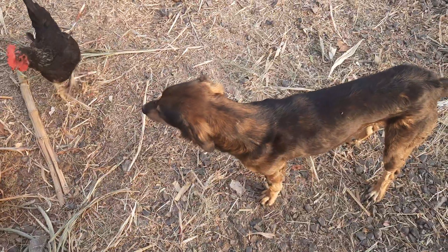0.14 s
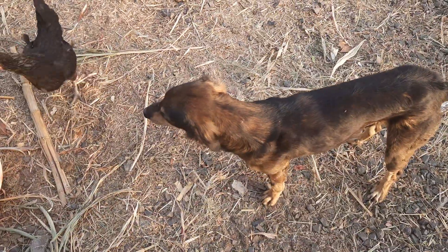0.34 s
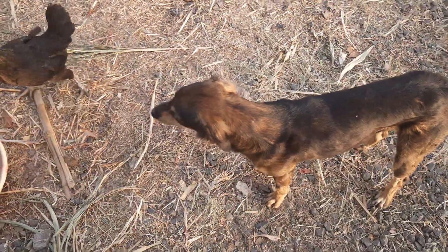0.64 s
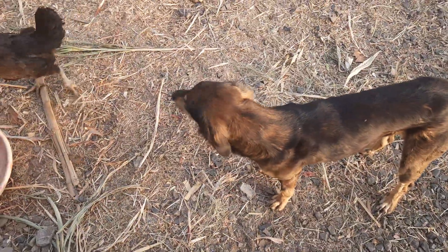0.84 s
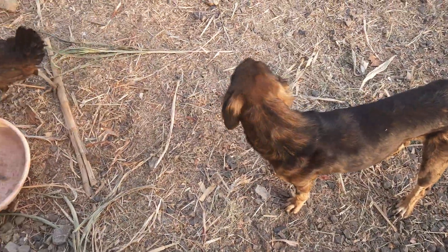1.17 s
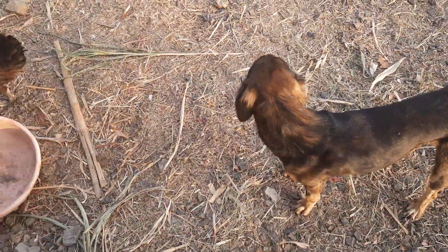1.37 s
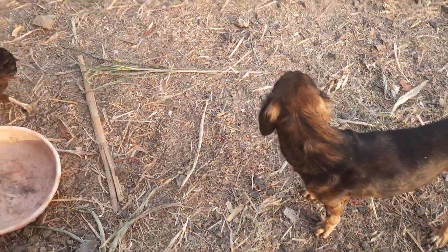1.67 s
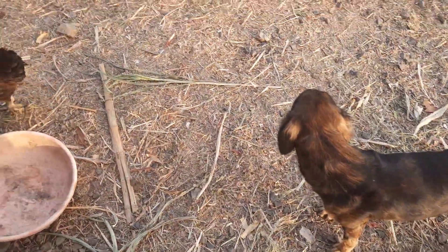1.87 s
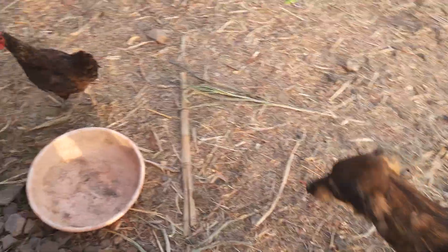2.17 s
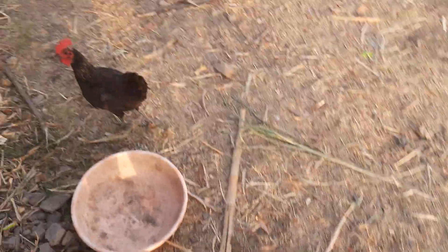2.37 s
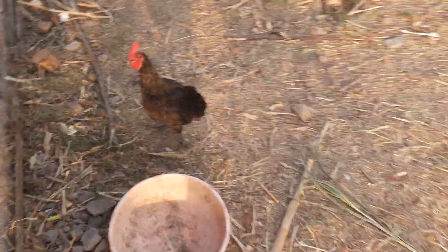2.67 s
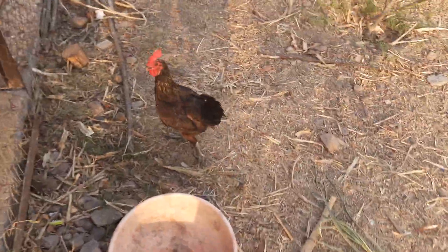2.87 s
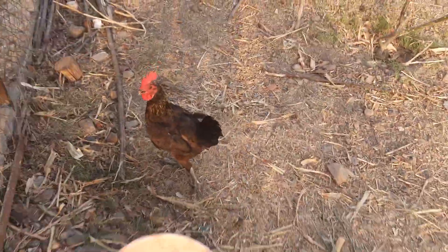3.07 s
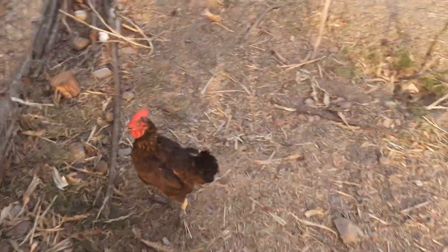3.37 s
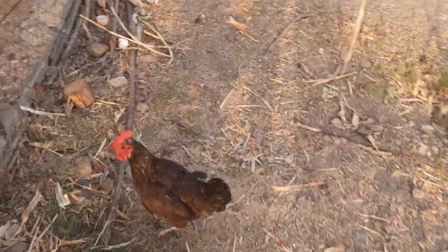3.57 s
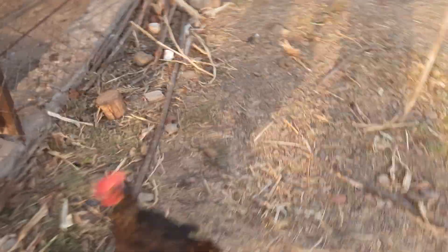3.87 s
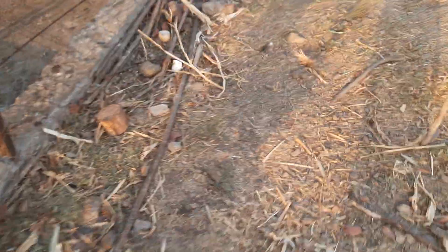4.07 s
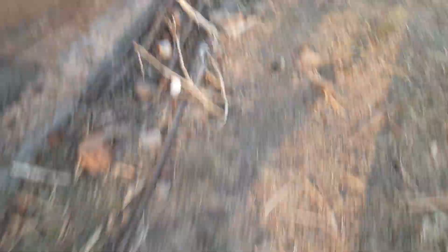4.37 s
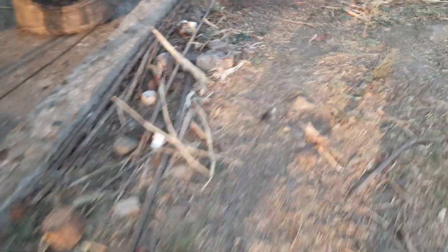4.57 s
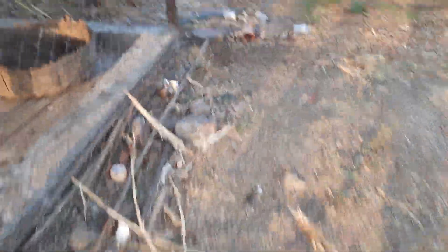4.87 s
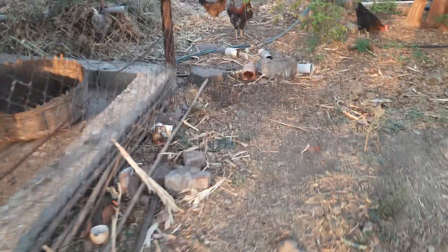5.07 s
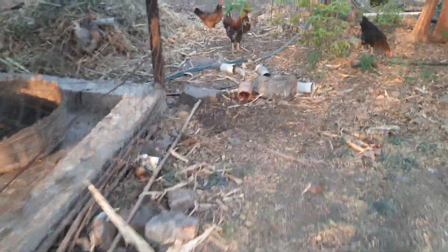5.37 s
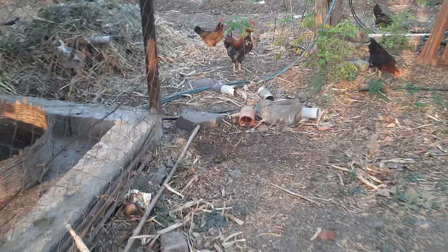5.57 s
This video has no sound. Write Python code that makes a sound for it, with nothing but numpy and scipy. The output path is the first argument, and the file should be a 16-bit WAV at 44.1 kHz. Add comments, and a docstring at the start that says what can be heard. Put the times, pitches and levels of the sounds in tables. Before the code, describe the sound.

A hen clucks in a quiet outdoor yard, with a slight echo. She starts with a brief, throbbing nasal whine and gives short, clear clucks about three times a second, spacing out a little until 2.8 seconds. From 3.2 to 3.7 seconds the clucks are quicker, softer and lower, mixed with thin falling squeaks. A longer, louder throbbing whine follows from about 3.6 to 4.4 seconds. Footsteps rustle dry straw, soft at first and louder from about 3.8 seconds, with scattered snaps, a cluster of cracking stalks around 5 seconds and a few tiny squeaks. Fingers bump the hand-held microphone at about 0.8, 3.8, 5.5 and 5.7 seconds, and brush it on the left around 3 to 3.5 seconds. Throughout, an insect ticks faintly, high and fast, over a low distant drone, and other fowl call far off in the first half.

```python
"""A hen in a straw yard

A hen clucks her way across a dry yard, pulses from her voice box ringing her throat and beak.
Twice a throbbing, nasal whine rises, and there are a few thin squeaks. Straw rustles and snaps
under foot, and fingers brush and bump the hand-held microphone. Behind it all are a low drone,
other fowl calling far off and an insect ticking in high pairs of wing strokes."""
import sys
import numpy as np
from scipy import signal
from scipy.fft import rfft, irfft
from scipy.io import wavfile

SR = 44100
rng = np.random.default_rng(int(sys.argv[2]) if len(sys.argv) > 2 else 0)


def waveform_to_disk(signal):
    """Save audio, clipped to [-1, 1], as 16-bit WAV at the path in sys.argv[1]."""
    frames = np.transpose(np.atleast_2d(signal))
    scaled = np.clip(frames, -1, 1) * 32767
    samples = np.round(scaled).astype(np.int16)
    wavfile.write(sys.argv[1], SR, samples)


N = 252693
TIME = np.arange(N) / SR


def from_db(db):
    """Turn decibels into a number to multiply by."""
    return 10 ** (np.asarray(db) / 20)


def rms_one(x):
    """Scale a signal to an average power of 1."""
    return x / np.sqrt(np.mean(x ** 2) + 1e-20)


def in_time(rows):
    """Join rows that begin with a time into curves, one for each other column."""
    s, *columns = np.transpose(rows)
    return [np.interp(TIME, s, c) for c in columns]


def at_hz(points, hz):
    """Read a spectrum's level in dB at any frequency."""
    return np.interp(np.log(hz), *np.transpose([(np.log(f), db) for f, db in points]))


def drift(rate):
    """A random wobble of about size 1 that turns `rate` times a second."""
    knots = rng.standard_normal(int(N / SR * rate) + 2)
    return rms_one(np.interp(TIME * rate, np.arange(len(knots)), knots))


def swell(s, width):
    """A smooth rise and fall around time s."""
    return np.exp(-((TIME - s) / width) ** 2 / 2)


def band(x, low_hz, high_hz, order=2):
    """Keep the sound between two frequencies."""
    edges = [low_hz, min(high_hz, SR / 2 - 1)]
    return signal.sosfilt(signal.butter(order, edges, "band", fs=SR, output="sos"), x)


def ring(x, hz, width_hz):
    """A resonance: each click starts a dying tone."""
    r, w = np.exp(-np.pi * width_hz / SR), 2 * np.pi * hz / SR
    return signal.lfilter([0, np.sin(w)], [1, -2 * r * np.cos(w), r * r], x + 1e-18)


def add(track, s, sound):
    """Mix a sound into a track at time s."""
    i = max(round(s * SR), 0)
    track[..., i:i + sound.shape[-1]] += sound[..., :N - i]


def pan(x, left_db):
    """Make stereo, with the left side louder than the right by left_db."""
    return x * from_db(np.array([np.atleast_1d(left_db), -np.atleast_1d(left_db)]) / 2)


def place(x, lead_ms, left_db, scatter_hz=800):
    """Sound reaches the right side later; the microphone's case scatters treble, which lags less."""
    hz = np.arange(N // 2 + 1) * SR / N
    lag_s = lead_ms / 1000 / np.hypot(1, hz / scatter_hz)
    late = irfft(rfft(x) * np.exp(-2j * np.pi * hz * lag_s), N)
    return pan(np.array([x, late]), left_db)


def noise(spectrum, alike):
    """Stereo noise in gently flickering bands; `alike` (0 to 1) is how well the two sides match."""
    edges = 22 * 2 ** np.arange(0, 10, .5)
    out, white = 0, rng.standard_normal((2, 2, N))
    for k, (low, high) in enumerate(zip(edges, edges[1:])):
        if high > spectrum[0][0] and low < spectrum[-1][0]:
            level_db = at_hz(spectrum, np.sqrt(low * high)) + 1.3 * drift(60)
            out = out + band(white[k % 2], low, high) * from_db(level_db)
    return rms_one(np.sqrt(1 + alike) * out[0] + np.sqrt(1 - alike) * out[1] * [[1], [-1]])


# The tone of the air. Each row: frequency in Hz, relative level in dB.
AIR_SPECTRUM = [(25, 15), (45, 13.5), (80, 22), (160, 7.5), (450, 3), (1000, -8), (2400, -2), (4500, -14),
                (16000, -52)]
# How loud the drone is. Each row: time in seconds, level in dB.
DRONE_LEVEL = [(0, -60.5), (2, -63), (2.7, -53.5), (4, -58), (5.7, -57)]


def air(air_db=-60.5, drone_hz=69):
    """Quiet outdoor air with a far, low drone that wavers."""
    phase = 2 * np.pi * np.cumsum(drone_hz + 2.5 * drift(14)) / SR
    drone = np.sin(phase) * from_db(in_time(DRONE_LEVEL)[0] + 2 * drift(10))
    return from_db(air_db) * noise(AIR_SPECTRUM, alike=0.69) + drone


# Echoes off walls and sheds. Each row: delay in seconds, level in dB.
WALL_ECHOES = [(.017, -25), (.029, -26), (.044, -25), (.061, -29)]


def yard(x, tail_db, t60):
    """A few wall echoes and a thin tail that fades 60 dB in t60 seconds, without bass."""
    t = TIME[:SR // 2]
    fade = from_db(-60 * t / t60) * np.minimum(t / 0.0096, 1)
    response = rms_one(rng.standard_normal((2, len(t))) * fade) * from_db(tail_db) / np.sqrt(len(t))
    for delay, echo_db in WALL_ECHOES:
        for side in response:
            side[int((delay + rng.uniform(0, .001)) * SR)] += from_db(echo_db)
    return signal.fftconvolve(band(x, 366, 12500)[None], response, axes=1)[:, :N]


# Distant calls. Each row: start in seconds, length in seconds, level in dB, beak ring in Hz.
FOWL_CALLS = [(0.614, 0.076, -58.5, 2370), (.84, 0.067, -60.5, 2650), (1.914, 0.096, -52.5, 2430),
              (2.544, 0.23, -54, 2110), (2.912, 0.029, -43, 2620), (3.06, 0.065, -52, 2600)]


def far_fowl(pitch_hz=418, beak_width_hz=740):
    """Other fowl call hoarsely: uneven pulses ring their beaks."""
    cycles = np.cumsum(pitch_hz * (1 + .08 * drift(200))) / SR
    pulses, out = np.diff(np.floor(cycles), prepend=0), np.zeros(N)
    for s, length, level_db, beak_hz in FOWL_CALLS:
        arch = np.sin(np.linspace(0, np.pi, int(length * SR)))
        voice = ring(pulses[int(s * SR):][:len(arch)], beak_hz, beak_width_hz)
        voice = ring(voice, beak_hz, 2 * beak_width_hz)
        add(out, s, from_db(level_db) * arch * rms_one(band(voice, beak_hz / 2, beak_hz * 2)))
    return out


# How loud the insect is. Each row: time in seconds, level in dB.
INSECT_LEVEL = [(0, -48), (.8, -48), (1.4, -50), (1.9, -55), (2.6, -44), (3.3, -47), (4.3, -49), (5.7, -52)]
# Spells of ticking. Each row: start and end in seconds.
TICKING_SPELLS = [(.046, 1.0), (1.076, 5.72)]


def insect(top_hz=8500, bottom_hz=6950, period_s=.0583, pair_gap_s=0.018, stroke_s=.013):
    """Pairs of wing strokes, each a scratchy falling chirp, over a faint far chorus."""
    out, along = np.zeros(N), np.linspace(0, 1, int(stroke_s * SR))
    for s in np.concatenate([np.arange(begin, end, period_s) for begin, end in TICKING_SPELLS]):
        for start in (s - stroke_s / 2, s - stroke_s / 2 + pair_gap_s):
            pitch = (top_hz + (bottom_hz - top_hz) * along) * (1 + .012 * rng.standard_normal())
            scratch = rms_one(band(rng.standard_normal(len(along)), bottom_hz, top_hz))
            stroke = np.sin(2 * np.pi * np.cumsum(pitch) / SR) + scratch / 2
            add(out, start, stroke * np.sin(np.pi * along) ** 2 * from_db(rng.standard_normal()))
    chorus = from_db(-10.5) * rms_one(band(rng.standard_normal((2, N)), bottom_hz, top_hz, order=3))
    return (out + chorus) * from_db(in_time(INSECT_LEVEL)[0])


# Footfalls. Each row: middle and width in seconds, straw level and soil level in dB.
FOOTFALLS = [(.13, 0.16, -49.5, -56), (.68, 0.17, -61, -61.5), (1.3, 0.14, -59, -69.5),
             (2.04, 0.12, -51.5, -61.5), (2.55, .12, -47.5, -50.5), (3.26, 0.038, -54, -47),
             (3.78, 0.14, -43, -44), (4.3, 0.088, -43.5, -51), (4.6, 0.14, -50.5, -69),
             (5.0, 0.11, -47, -55), (5.53, 0.19, -44.5, -50)]
# The straw's growing rustle between steps. Each row: time in seconds, level in dB.
RUSTLE_LEVEL = [(0, -73.5), (1.8, -63.5), (3.0, -55), (5.7, -51.5)]
# Its high hiss. Each row: time in seconds, level in dB before the boost.
STRAW_HISS_LEVEL = [(0.0, -62), (0.56, -71), (1.28, -64), (1.48, -66.5), (1.71, -76), (2.89, -69),
                    (3.11, -65), (3.48, -70), (3.81, -57.5), (4.2, -62), (4.44, -64.5), (4.55, -51),
                    (5.01, -57), (5.34, -51.5), (5.54, -51), (5.73, -47.5)]
# Where the hiss sits. Each row: time in seconds, left over right in dB.
HISS_SIDE = [(2.3, 1), (3.5, 6.5), (4.6, 3), (5.7, 3)]
# The tone of crunch, hiss and soil. Each row: frequency in Hz, relative level in dB.
CRUNCH_SPECTRUM = [(300, -53), (700, 2.5), (1300, 9), (2500, 10), (4000, 2), (7000, 1), (15000, -49)]
HISS_SPECTRUM = [(1500, -28), (3500, 6.5), (6500, 14.5), (9500, 7.5), (12000, 20), (16000, 0)]
SOIL_SPECTRUM = [(125, -12.5), (250, 2.5), (500, 9), (900, -8.5), (2000, -44)]


def footsteps(grain_db=2.0, hiss_boost_db=7, soil_under_straw_db=-5.5):
    """Each step swells and fades, scuffing soil and crushing straw, which gives way in tiny grains."""
    rustle = from_db(in_time(RUSTLE_LEVEL)[0])
    straw_power, soil_power = rustle ** 2, (rustle * from_db(soil_under_straw_db)) ** 2
    for s, width, straw_db, soil_db in FOOTFALLS:
        weight = swell(s, width)
        straw_power += (weight * from_db(straw_db)) ** 2
        soil_power += (weight * from_db(soil_db)) ** 2
    grains = rms_one(from_db(grain_db * drift(700)))
    crunch = pan(noise(CRUNCH_SPECTRUM, alike=0.033) * np.sqrt(straw_power), left_db=-1.5)
    hiss_gain = from_db(in_time(STRAW_HISS_LEVEL)[0] + hiss_boost_db)
    hiss = pan(noise(HISS_SPECTRUM, alike=0.017) * hiss_gain, in_time(HISS_SIDE)[0])
    return grains * (crunch + hiss) + noise(SOIL_SPECTRUM, alike=0.66) * np.sqrt(soil_power)


# Short rubs. Each row: middle and width in seconds, level in dB, centre in Hz, left over right in dB.
RUBS = [(2.70, 0.047, -50, 125, -15), (4.42, 0.044, -52, 770, 23), (4.69, 0.057, -41, 5700, -1.5),
        (4.70, .032, -45.5, 199, 1.5), (4.86, 0.021, -52.5, 251, 8), (5.40, 0.086, -51, 330, 20)]


def shuffles(spread=1.427):
    """A dragged foot or shifting hand rubs out a band of noise: low on soil and skin, high on straw."""
    out = 0
    for s, width, level_db, hz, left_db in RUBS:
        white = rng.standard_normal(N) + 0.64 * rng.standard_normal((2, N))
        rub = rms_one(band(white, hz / spread, hz * spread))
        out = out + pan(rub * swell(s, width) * from_db(level_db), left_db)
    return out


# The loudest stalks breaking. Each row: start in seconds, level in dB before the trim,
# pitch in Hz, left over right in dB.
BIG_SNAPS = [(0.173, -25.5, 1380, 2), (0.236, -31.5, 4150, 0), (0.611, -25.5, 902, -6.5),
             (2.202, -34, 6500, 2), (2.339, -39, 7060, 0), (2.451, -35, 869, 1), (4.543, -27, 2700, 8),
             (4.936, -26, 1130, 4.0), (4.953, -21.5, 4150, 5), (4.972, -22, 4310, 5), (4.981, -28, 2390, 0),
             (5.005, -22.5, 6840, 3), (5.045, -24.5, 6850, 5), (5.17, -26, 3000, 3), (5.488, -25, 921, -2),
             (5.504, -25, 907, -4)]
# Small stalks giving way at random. Each row: start and end in seconds, snaps per second,
# typical level in dB before the trim, typical pitch in Hz.
SMALL_SNAPS = [(2.101, 2.899, 5, -44.5, 6940), (4.931, 5.099, 90, -28.5, 3480)]


def snaps(crack_s=0.0022, splinter_db=-17, splinter_s=0.041, trim_db=-6, broad_db=-4, spread_db=3):
    """A stalk breaks with a broad crack, strongest around its own pitch, and a short splintering."""
    out, t = np.zeros((2, N)), TIME[:SR // 20]
    fade = np.exp(-t / crack_s) + from_db(splinter_db) * np.exp(-t / splinter_s)
    stalks = list(BIG_SNAPS)
    for begin, end, per_s, db, hz in SMALL_SNAPS:
        for when, size, pitch in rng.random((round((end - begin) * per_s), 3)):
            s = begin + (end - begin) * when
            stalks.append((s, db + spread_db * (2 * size - 1), hz * 2 ** (2 * pitch - 1), 2))
    for s, level_db, hz, left_db in stalks:
        white = rng.standard_normal(len(t)) + 2.4 * rng.standard_normal((2, len(t)))
        crack = rms_one(band(white, hz / 1.69, hz * 1.44))
        crack += from_db(broad_db) * rms_one(band(white, 600, 7300, order=1))
        add(out, s, pan(from_db(level_db + trim_db) * fade * crack, left_db))
    return out


# Knocks on the case. Each row: start in seconds, level in dB, pitch in Hz, seconds to fade 60 dB,
# crack compared with thud in dB, left over right in dB.
CASE_BUMPS = [(0.8341, -18, 472, 0.012, 3.5, -22), (0.834, -38.5, 308, 0.073, 15.5, 8),
              (3.7808, -21, 860, 0.014, -27, -3), (3.7855, -17.5, 890, 0.012, -12, 0),
              (5.5048, -15, 920, 0.011, -3, 5), (5.667, -19.5, 443, 0.015, -18, -14),
              (5.674, -23.5, 193, 0.04, -28, -13), (5.6865, -18.5, 255, 0.018, -2.5, -19.5)]
# Sliding fingers. Each row: middle and width in seconds, level on the left in dB.
FINGER_BRUSHES = [(2.98, 0.025, -42.5), (3.04, 0.015, -35.5), (3.162, 0.014, -27), (3.22, 0.041, -37),
                  (3.405, 0.023, -44.5), (3.50, 0.025, -45.5), (4.429, 0.046, -39.5)]
# The tone of rubbing skin. Each row: frequency in Hz, relative level in dB.
SKIN_SPECTRUM = [(200, -2.5), (1000, -0.5), (3200, -2.5), (6000, -4), (9000, -6), (12500, -5), (16000, 3.5)]


def fingers(crack_s=0.00017):
    """Fingers bump the microphone's case, which thuds, and slide over its left opening."""
    out, t = np.zeros((2, N)), TIME[:SR // 10]
    for s, level_db, hz, t60, crack_db, left_db in CASE_BUMPS:
        thud = -np.sin(2 * np.pi * hz * t) * from_db(-60 * t / t60)
        crack = from_db(crack_db) * np.exp(-t / crack_s)
        add(out, s, pan(from_db(level_db) * (thud + crack), left_db))
    pressure = sum(from_db(db) * swell(s, width) for s, width, db in FINGER_BRUSHES)
    return out + noise(SKIN_SPECTRUM, alike=0) * pressure * from_db([[0], [-24]])


# Squeaks. Each row: start and length in seconds, first and last pitch in Hz, level in dB,
# octave compared with the main tone in dB.
SQUEAK_GLIDES = [(3.25, 0.15, 2236, 1840, -40, -34), (3.409, .115, 2155, 1470, -37.5, -36),
                 (3.506, 0.065, 544, 600, -40.5, 5), (3.625, 0.042, 560, 521, -36.5, 10),
                 (3.661, 0.05, 516, 507, -32.5, -7), (4.641, 0.0184, 918, 594, -41, -8),
                 (4.888, 0.0134, 876, 740, -46.5, 10), (5.109, 0.026, 968, 620, -31.5, -1),
                 (5.506, 0.023, 931, 720, -30, -24), (5.704, 0.029, 876, 736, -40, 2.5)]


def squeaks(bend=1.4):
    """Thin, fluttering tones slide in pitch, each with a second tone an octave above."""
    out = np.zeros(N)
    for s, length, first_hz, last_hz, level_db, octave_db in SQUEAK_GLIDES:
        along = np.linspace(0, 1, int(length * SR))
        waver_hz, flutter_db = 26 * drift(450)[:len(along)], 1.5 * drift(300)[:len(along)]
        pitch = first_hz + (last_hz - first_hz) * along ** bend + waver_hz
        phase = 2 * np.pi * np.cumsum(pitch) / SR
        tone = np.sin(phase) + from_db(octave_db) * np.sin(2 * phase)
        add(out, s, from_db(level_db + flutter_db) * np.sin(np.pi * along) * tone)
    return out


# Each whine's course along the tops of its throbs. Each row: time in seconds, pitch in Hz, level in dB.
FIRST_COURSE = [(0, 493.5, -31), (.135, 480.7, -34.5), (.18, 464, -35), (.215, 452, -35), (.25, 441, -45.5),
                (.29, 430, -50.5)]
SECOND_COURSE = [(3.55, 422.4, -57), (3.64, 429.5, -45.5), (3.72, 448, -29.5), (3.805, 450.4, -24),
                 (4.057, 477.6, -23.5), (4.235, 459.2, -25.5), (4.38, 424.6, -44)]
# How the throat colours each whine. Each row: frequency in Hz, relative level in dB.
FIRST_COLOUR = [(480, -9.5), (960, -4.5), (1440, 2), (1930, -8.5), (2400, -22), (2900, -7), (3400, -7.5),
                (3870, -6), (4350, -2), (4800, -6), (5300, -7), (5800, -12), (7000, -14), (9000, -42)]
SECOND_COLOUR = [(460, -1), (920, -5), (1380, 1), (1840, -3), (2320, -6.5), (2780, -14), (3230, -0.5),
                 (3700, -12), (4100, 7.5), (4450, 6.5), (4750, -6.5), (5150, -9.5), (5800, -19.5),
                 (6450, -9.5), (9000, -47)]


def whine(course, throat, crest_s, period_s, sag_db, dip_share, jitter_share, rasp_db):
    """A nasal held note; after each throb the level sags and the pitch drops fast, then climbs back."""
    top_hz, level_db = in_time(course)
    along = ((TIME - crest_s) / period_s + .03 * drift(12)) % 1  # 0 to 1 between throbs
    sag = np.sin(np.pi * along) ** 2
    dip = dip_share * np.sin(np.pi * along ** 0.68) ** 2 * from_db(2 * drift(12))
    pitch = top_hz * (1 - dip + jitter_share * (.5 + sag) * drift(400))
    on = (TIME > course[0][0]) & (TIME < course[-1][0])
    phase = 2 * np.pi * np.cumsum(pitch[on]) / SR
    tone, out = 0, np.zeros(N)
    for k in range(1, 21):
        # the head moves, so each overtone grows and fades a little on its own
        overtone_db = at_hz(throat, k * pitch[on]) + 2 * drift(25)[on]
        tone = tone + from_db(overtone_db) * np.sin(k * phase - k * k / 10)
    rasp = rms_one(band(rng.standard_normal(len(phase)), 2800, 7500) * (1 + np.cos(phase)))
    out[on] = rms_one(tone) + from_db(rasp_db) * rasp
    return out * from_db(level_db - sag_db * sag * (1 + .2 * drift(12)))


# Where the calls come from. Each row: time in seconds, head start of the left side in milliseconds.
LEFT_LEAD = [(2.1, 0.36), (2.6, 0.14)]


def passing(x):
    """The calls move towards the front: the right side hears them less and less late."""
    late = np.interp(TIME - in_time(LEFT_LEAD)[0] / 1000, TIME, x)
    return pan(np.array([x, late]), left_db=-2)


# The hen's clucks. Each row: start and length in seconds, first pulse rate in Hz, level in dB,
# beak ring in Hz, beak compared with throat in dB.
HEN_CLUCKS = [(0.016, 0.027, 148.1, -20, 1035, -3.5), (0.333, 0.029, 154.8, -19, 1110, -5.5),
              (.553, 0.026, 147.6, -19, 1020, -3), (0.721, 0.026, 150.3, -19, 1190, -6.5),
              (1.124, 0.024, 161.8, -19, 1160, -10.5), (1.339, 0.023, 172, -20.5, 935, -2),
              (1.62, 0.031, 154.3, -23.5, 1050, -8), (2.098, .032, 164.8, -26, 1300, -3.5),
              (2.464, 0.025, 153, -22, 1196, -2), (2.776, .031, 245.3, -25, 1166, 1),
              (3.203, .029, 291.2, -31, 1160, 9.5), (3.38, 0.036, 288.2, -26.5, 1140, 2.5),
              (3.477, 0.043, 309, -35, 960, 13), (3.58, .044, 342, -29, 1000, 7),
              (3.709, .043, 352.4, -28.5, 1030, 12)]
# The throat's main ring, lower in the later clucks. Each row: time in seconds, frequency in Hz.
THROAT_RING = [(0, 602), (1.2, 602), (3.39, 481), (3.47, 338)]
# Its higher rings. Each row: frequency and width in Hz, level compared with the main ring in dB.
HIGH_RINGS = [(1640, 120, -12.5), (2330, 174, -22.5), (2930, 100, -28.5), (3890, 290, -24.5)]


def clucks(aim_hz=312.2, reach=.82, shimmer_db=1.3, leak=.022, throat_width_hz=135, beak_width_hz=170):
    """Each cluck is a short run of pulses from the voice box that ring the throat and beak."""
    out = np.zeros(N)
    for s, length, first_hz, level_db, beak_hz, beak_db in HEN_CLUCKS:
        t = TIME[:int((length + .03) * SR)]
        along = np.minimum(t / length, 1)
        # the pulse rate slides most of the way to aim_hz
        cycles = np.cumsum(first_hz + reach * (aim_hz - first_hz) * along ** 1.7) / SR
        effort = np.interp(along, [0, .54, 1], [.49, 1, .4]) * (along < 1)
        openings = np.diff(np.floor(cycles), prepend=-1)
        pulses = openings * from_db(shimmer_db * rng.standard_normal(len(t)))
        breath = leak * rng.standard_normal(len(t)) * np.exp(-4 * (cycles % 1))  # after each opening
        source = effort * (pulses + breath)
        throat_hz = np.interp(s, *np.transpose(THROAT_RING))
        voice = ring(source, throat_hz, throat_width_hz)
        voice -= from_db(beak_db) * ring(source, beak_hz, beak_width_hz)
        for hz, width_hz, ring_db in HIGH_RINGS:
            strength, shift = rng.standard_normal(2)  # no two clucks are alike
            voice -= from_db(ring_db + 3 * strength) * ring(source, hz * (1 + 0.057 * shift), width_hz)
        add(out, s, from_db(level_db) * voice)
    return band(out, 240, 5100, order=3)


def scene():
    """The voices echo in the yard; the other sounds stay dry."""
    calls = clucks() + squeaks() + far_fowl()
    first = whine(FIRST_COURSE, FIRST_COLOUR, crest_s=0.028, period_s=0.0827,
                  sag_db=10, dip_share=.012, jitter_share=.002, rasp_db=-25)
    second = whine(SECOND_COURSE, SECOND_COLOUR, crest_s=3.973, period_s=.0857,
                   sag_db=9.5, dip_share=.04, jitter_share=.0065, rasp_db=-22)
    whines = place(first, lead_ms=0.34, left_db=-6.5) + place(second, lead_ms=0.31, left_db=-3)
    echoes = yard(calls, tail_db=-7.5, t60=0.25) + yard(first + second, tail_db=-12, t60=.45)
    voices = passing(calls) + whines + echoes
    return voices + insect() + snaps() + fingers() + footsteps() + shuffles() + air()


def record(dry):
    """The lowest rumble is taken out and the highest treble is cut steeply."""
    low_cut_hz, high_cut_hz = 33, 16100
    lean = signal.sosfilt(signal.butter(4, low_cut_hz, "high", fs=SR, output="sos"), dry)
    return signal.sosfilt(signal.ellip(10, .2, 80, high_cut_hz, fs=SR, output="sos"), lean)


dry = scene()
out = record(dry)
waveform_to_disk(out)
```